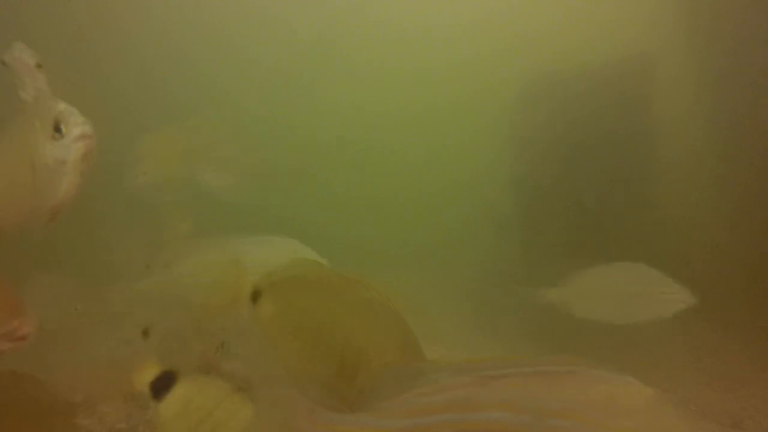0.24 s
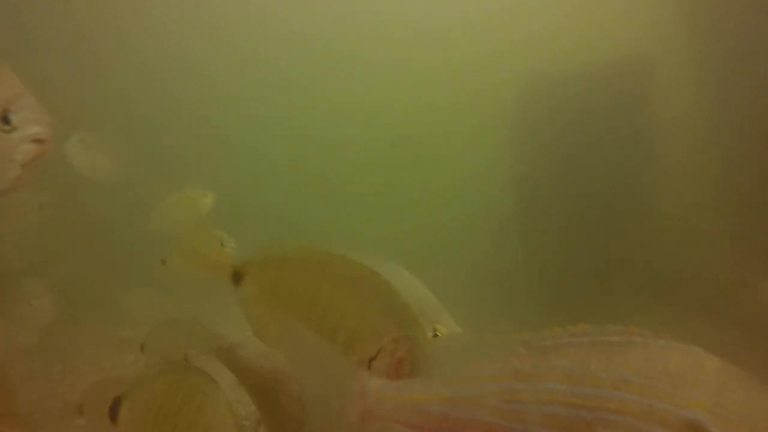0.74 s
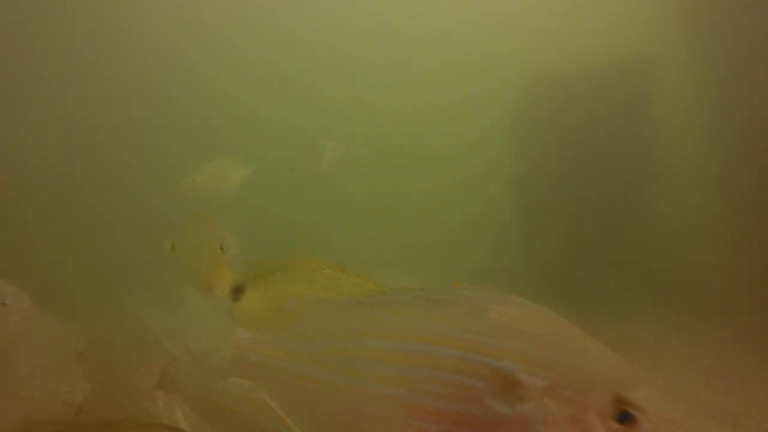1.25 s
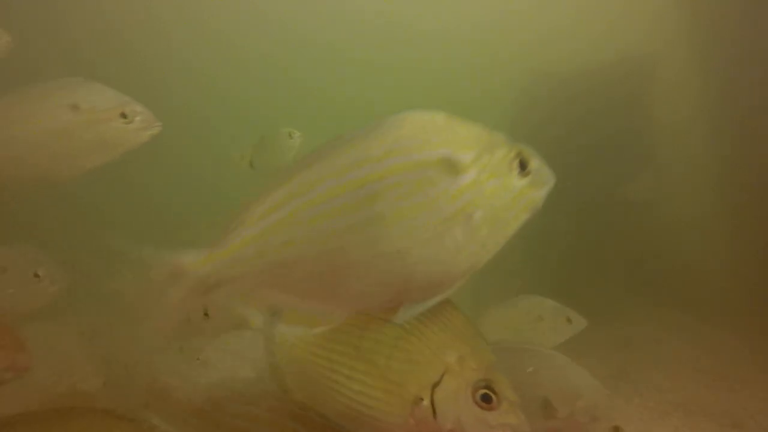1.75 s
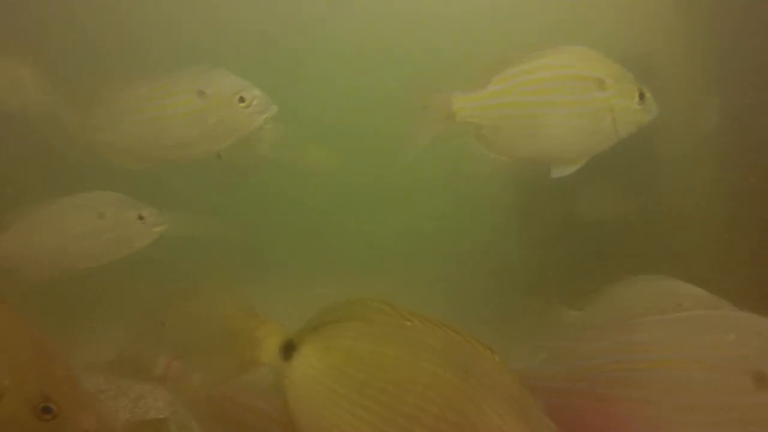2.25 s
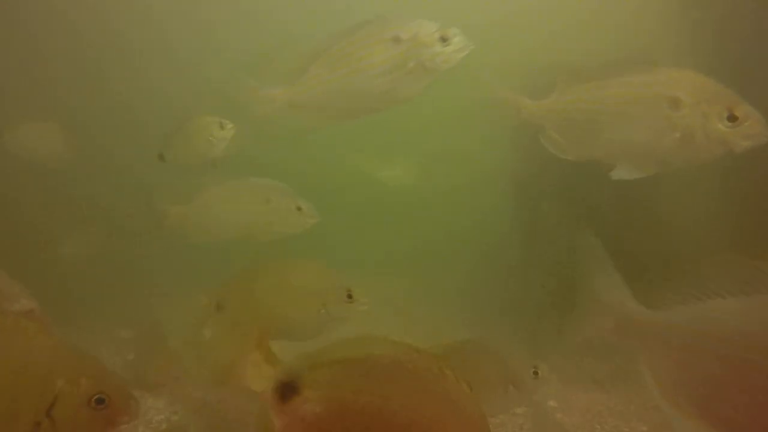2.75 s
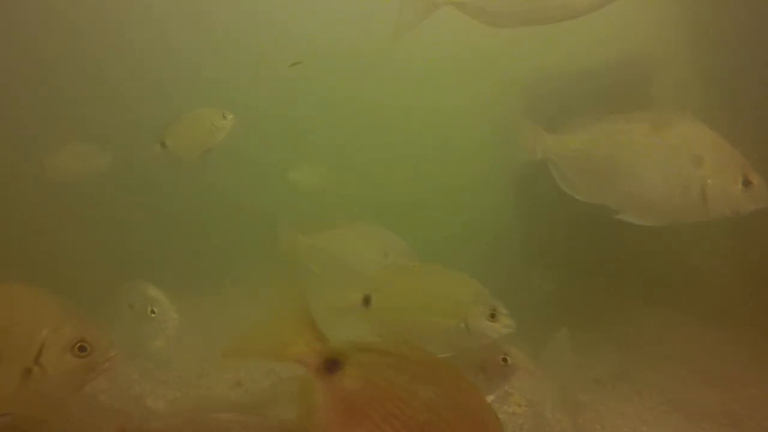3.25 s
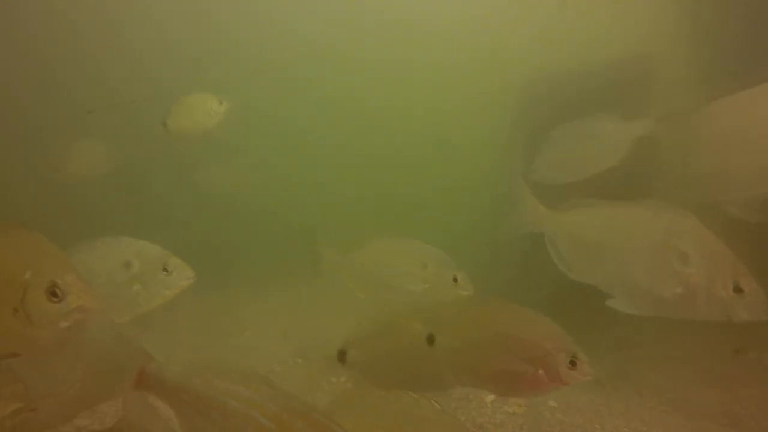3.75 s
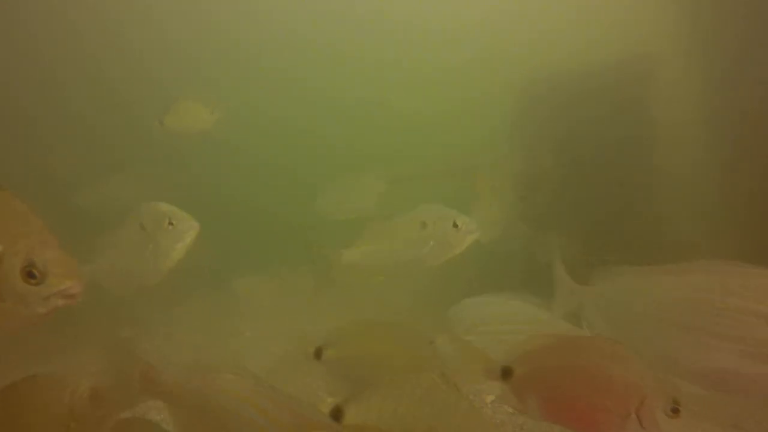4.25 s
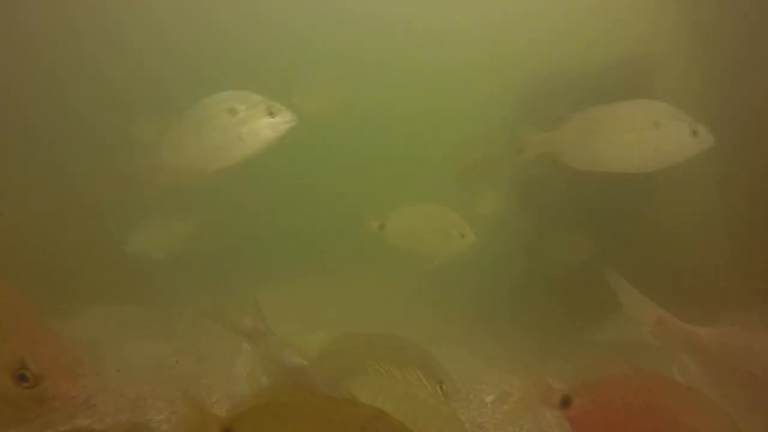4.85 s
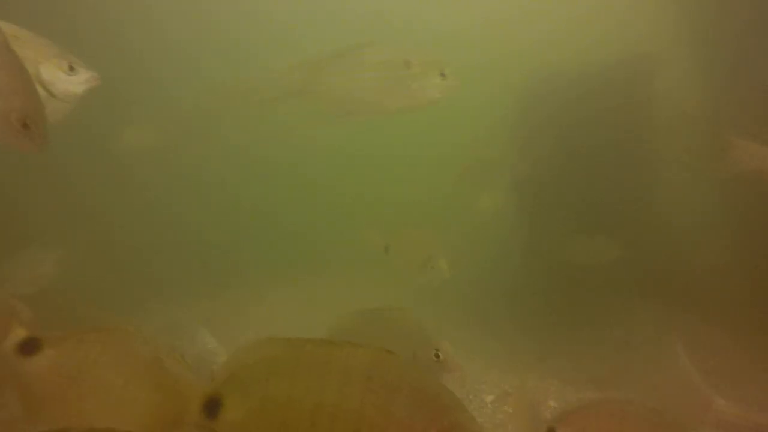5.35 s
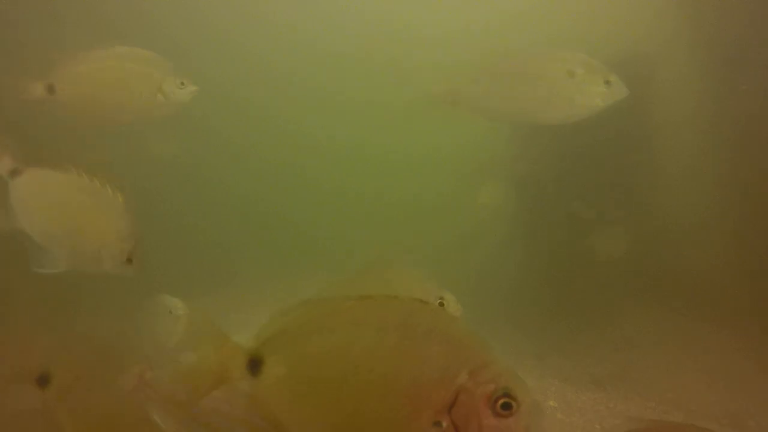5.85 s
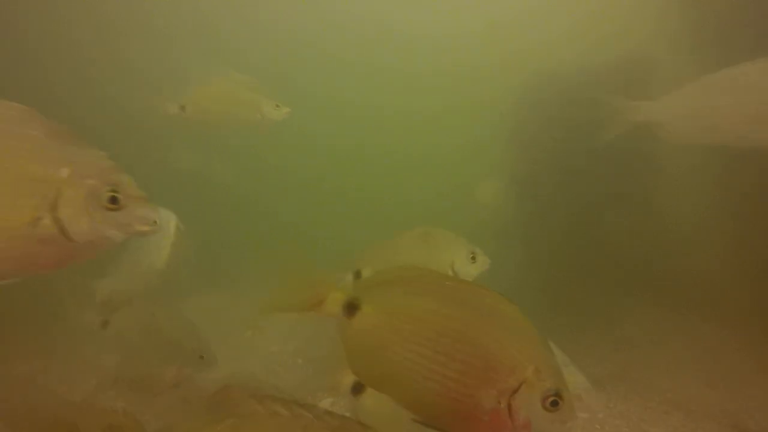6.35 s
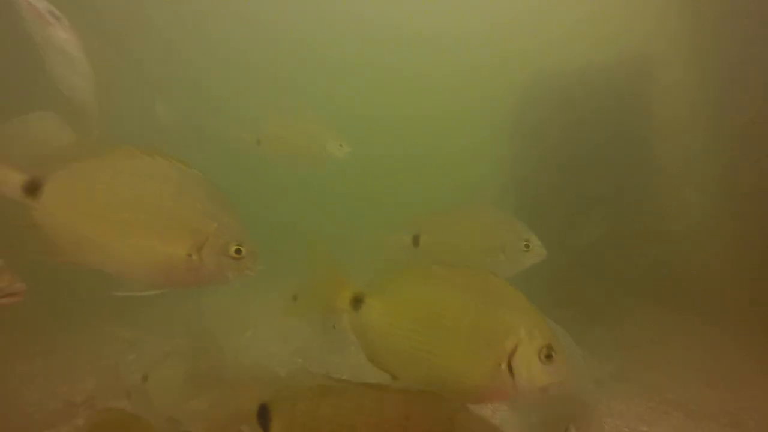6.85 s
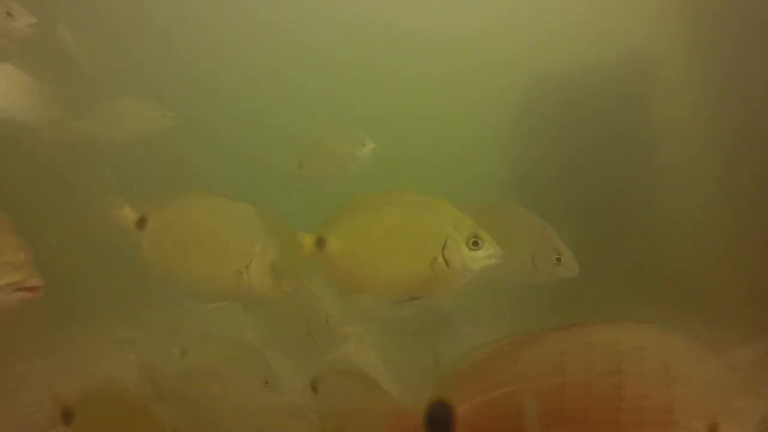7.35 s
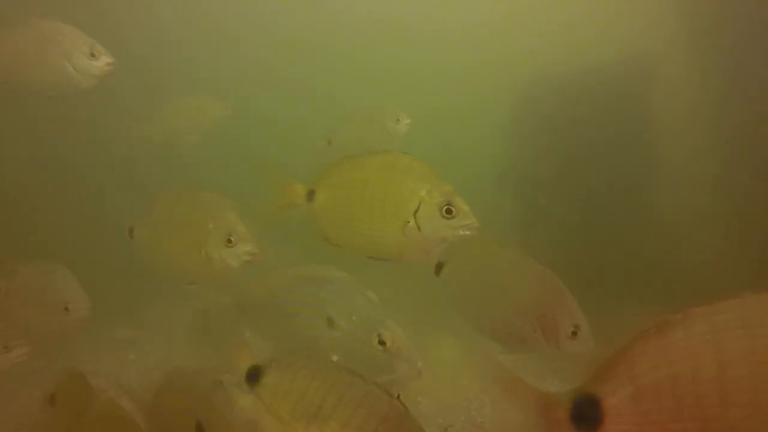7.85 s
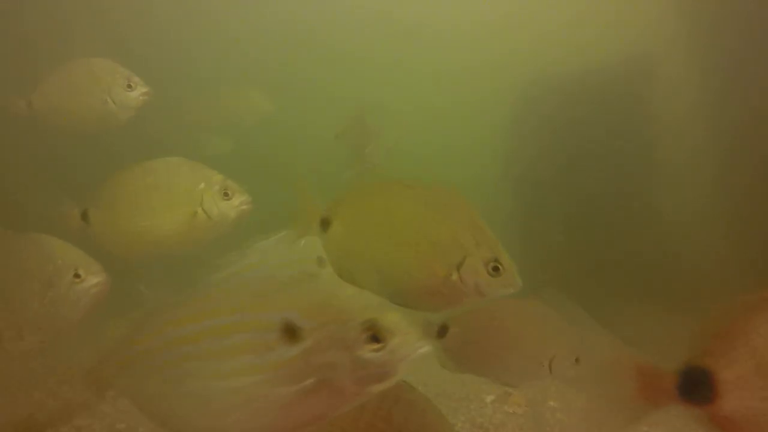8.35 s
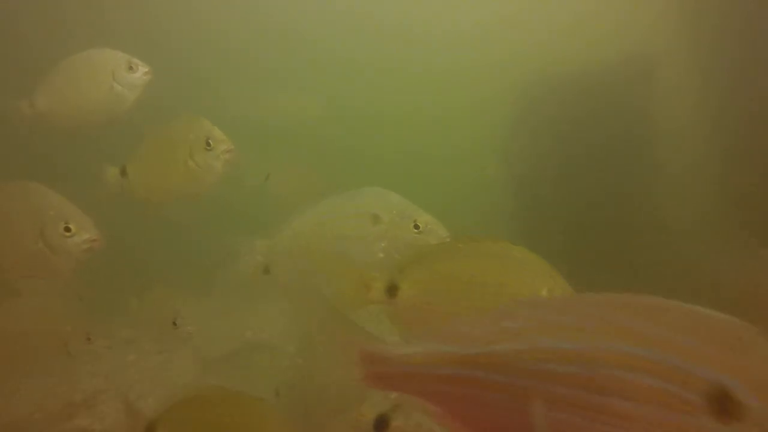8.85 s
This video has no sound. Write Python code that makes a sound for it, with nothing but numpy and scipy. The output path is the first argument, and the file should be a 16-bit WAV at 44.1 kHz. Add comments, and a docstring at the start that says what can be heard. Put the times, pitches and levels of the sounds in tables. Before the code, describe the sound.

Underwater on the bottom beside a pier, snapping shrimp make a continuous fine crackle with many sharp, ringing clicks close by. Water pushed by feeding fish rumbles and thumps in surges, with small gurgles and bubble blips. A deep wavering drone swells strongest near the start, and low gliding hums resemble a distant motor. The microphone sits in a waterproof case, giving a hollow, muffled, resonant colour.

```python
"""Snapping shrimp and fish beside a pier

A microphone in a waterproof case lies on the bottom beside a pier, among feeding fish.
Snapping shrimp crackle all around: sharp pulses and noise bursts ring the resonances of the case.
Water pushed by passing fish rumbles, thumps and gurgles: shaped noise, short tones and ringing clicks.
A low, wavering sine drone comes and goes, and a few sine hums glide in pitch like a distant motor.
An even wash of filtered noise lies under it all."""
import sys
import numpy as np
from scipy import signal
from scipy.fft import rfft, irfft, next_fast_len
from scipy.io import wavfile
from scipy.ndimage import uniform_filter1d

SR = 44100
rng = np.random.default_rng(int(sys.argv[2]) if len(sys.argv) > 2 else 0)


def dump(signal):
    """Clip the signal to [-1, 1] and save it as 16-bit WAV at the path in sys.argv[1]."""
    limited = np.clip(np.atleast_2d(signal).T, -1, 1)
    pcm = np.round(limited * 32767).astype(np.int16)
    wavfile.write(sys.argv[1], SR, pcm)


N = 401310


def from_db(db):
    """Decibels to gain."""
    return 10 ** (np.asarray(db) / 20)


def rms_one(x):
    """Scale to an rms of 1."""
    return x / np.sqrt(np.mean(x ** 2) + 1e-20)


def add(out, s, sound):
    """Mix a sound in at a time in seconds."""
    at = max(round(s * SR), 0)
    out[at:at + len(sound)] += sound[:max(N - at, 0)]


def butter(x, hz, kind, order=2):
    """Causal Butterworth filter."""
    sections = signal.butter(order, hz, kind, fs=SR, output="sos")
    return signal.sosfilt(sections, x + 1e-18)


def resonate(x, hz, width_hz):
    """One two-pole resonance, gain about 1 on top; the narrower, the longer it rings."""
    r = np.exp(-np.pi * width_hz / SR)
    feed = np.array([1, 0, -1]) * (1 - r * r) / 2
    feedback = [1, -2 * r * np.cos(2 * np.pi * hz / SR), r * r]
    return signal.lfilter(feed, feedback, x + 1e-18)


def noise(spectrum):
    """Noise shaped to a spectrum of (frequency [Hz], relative level [dB]); rms 1."""
    hz, db = np.transpose(spectrum)
    size = next_fast_len(N)
    bins = np.maximum(np.arange(size // 2 + 1) * SR / size, 1)
    curve_db = np.interp(np.log(bins), np.log(hz), db, left=-120, right=-120)
    white = rfft(rng.standard_normal(size))
    return rms_one(irfft(white * from_db(curve_db), size)[:N])


def drift(per_s):
    """Random wander through per_s points a second; rms 1."""
    points = rng.standard_normal(4000)
    return rms_one(np.interp(np.arange(N) / SR * per_s, np.arange(len(points)), points))


def clicks(per_s, spread_db):
    """Random clicks of either sign: many small, a few large."""
    sizes = from_db(spread_db * np.minimum(rng.exponential(1, N), 4))
    signed = sizes * rng.choice([-1, 1], N)
    return signed * (rng.random(N) < per_s / SR)


def spells(rows, rise_db_per_s, fall_db_per_s, rest_db):
    """Gain that rises, holds and falls back to a resting level, once for each row (s, hold s, dB)."""
    t, power = np.arange(N) / SR, from_db(rest_db) ** 2
    for s, hold_s, db in rows:
        before_db = rise_db_per_s * np.maximum(s - t, 0)
        after_db = fall_db_per_s * np.maximum(t - s - hold_s, 0)
        power = power + from_db(db - before_db - after_db) ** 2
    return np.sqrt(power)


def case(x):
    """Sound in the water reaches the microphone through the parallel resonances of the case."""
    # resonances of the case: (frequency [Hz], width [Hz], relative level [dB])
    resonances = [(730, 38, -73), (1606, 67, -3.5), (1973, 102, -1), (2331, 245, 2), (2780, 120, 1.5),
                  (2996, 110, -2.5), (3600, 189, 0.5), (4200, 340, -8.5), (5175, 256, -4.5),
                  (5860, 2070, -13.5), (7890, 680, -13.5), (8770, 420, -16.5), (10840, 780, -19),
                  (12200, 510, -20), (15000, 830, -35)]
    rung = 0
    for k, (hz, width_hz, db) in enumerate(resonances):
        rung = rung + (-1) ** k * from_db(db) * resonate(x, hz, width_hz)  # neighbours alternate in sign
    return butter(rung, 330, "high")


def far_shrimp(per_s=150, spread_db=5.0, smear_s=0.0036, tilt_db=0.14, level_db=-50.5):
    """Hundreds of far snaps a second, smeared by their paths in five colours, merge into a frying crackle."""
    out, keep = 0, np.exp(-2 / (smear_s * SR))
    for k, hz in enumerate(np.geomspace(2100, 10000, 5)):
        power = signal.lfilter([1], [1, -keep], clicks(per_s, spread_db) ** 2 + 1e-18)
        bursts = rms_one(np.sqrt(power) * rng.standard_normal(N))
        band_hz = [hz / 1.51, min(hz * 1.45, .45 * SR)]
        out = out + from_db(k * tilt_db) * butter(bursts, band_hz, "band")
    return from_db(level_db) * rms_one(case(out))


def sea_wash(level_db=-52.0):
    """The even wash of the sea: steady shaped noise."""
    # spectrum of the wash: (frequency [Hz], relative level per Hz [dB])
    wash_spectrum = [(20, -5), (70, -3.5), (125, -2.5), (200, -4), (420, -10.5), (750, -14), (1050, -17),
                     (1400, -19), (2300, -8.5), (4600, -21), (7500, -23.5), (12400, -32.5), (15000, -35.5),
                     (16000, -60)]
    return from_db(level_db) * noise(wash_spectrum)


def steadied(x, window_s=0.18):
    """Noise with its slow level swings evened out."""
    return x / np.sqrt(uniform_filter1d(x * x, int(window_s * SR)) + 1e-6)


def moving_water(swell_db=0.5, rumble_db=1.5, gurgle_db=-1.0, slosh_db=-12.0, lumpy_db=2.0, patchy_db=3.5):
    """Eddies press on the case; stirred water gurgles in short rings, strongest near its lowest resonance."""
    # surges of water round the case:
    # (time at full strength [s], hold [s], relative slow swell [dB], relative eddies [dB])
    surges = [(0.102, 0.52, -53.5, -52), (0.947, 0.74, -50, -40), (2.45, .08, -70, -59),
              (3.0, 0.21, -57.5, -61), (4.05, 0.39, -45, -40.5), (4.85, 0.37, -64, -50),
              (6.85, 0.18, -42.5, -39.5), (7.95, 0.39, -70, -53.5), (8.9, 0.23, -43, -40)]
    # stirred, gurgling water: (time at full strength [s], hold [s], relative level [dB])
    gurgles = [(.75, 1, -62), (3.7, 0.14, -58), (4.25, 0.76, -57), (7.5, 0.3, -54)]
    # spectrum of the eddies: (frequency [Hz], relative level per Hz [dB])
    rumble_spectrum = [(25, -26), (42, -1), (54, 6), (66, 9.5), (82, 5.5), (100, -8.5), (130, -26.5),
                       (250, -36.5), (500, -70)]
    swell_rows = [(s, hold_s, db) for s, hold_s, db, _ in surges]
    rumble_rows = [(s, hold_s, db) for s, hold_s, _, db in surges]
    swell = spells(swell_rows, rise_db_per_s=32, fall_db_per_s=40, rest_db=-63)
    rumble = spells(rumble_rows, rise_db_per_s=34, fall_db_per_s=44, rest_db=-59)
    gurgle = spells(gurgles, rise_db_per_s=31, fall_db_per_s=24, rest_db=-64.5)
    swell, rumble, gurgle = (gain * from_db(lumpy_db * drift(12)) for gain in (swell, rumble, gurgle))

    pressure = steadied(noise([(12, -17), (22, -15), (31, 3), (39, -23), (60, -38)]))
    eddies = steadied(noise(rumble_spectrum))
    low = from_db(swell_db) * swell * pressure + from_db(rumble_db) * rumble * eddies

    rings = 0
    for hz in np.geomspace(180, 950, 24):
        stirred = clicks(per_s=70, spread_db=5.5) * from_db(patchy_db * drift(10))
        rings = rings + resonate(stirred, hz, hz / 15)
    gurgling = from_db(gurgle_db) * rms_one(resonate(rings, 739, 79))
    slosh = from_db(slosh_db) * rms_one(butter(rings, 300, "low"))
    return low + gurgle * (gurgling + slosh)


def drone(idle_hz=54.4, sag_hz=2.45, waver_hz=1.36, flutter_db=1.0, drone_db=0.5):
    """A wavering sine drone swells and fades, and sags a little in pitch when it is loud."""
    # swells of the drone: (time at full strength [s], hold [s], relative level [dB])
    drone_swells = [(.76, .02, -44.5), (1.12, 0.52, -28), (3.7, 0.43, -37), (4.45, 0.18, -41),
                    (4.95, .28, -41.5), (6.55, 0.48, -42.5), (8.95, 0.19, -38.5)]
    gain = spells(drone_swells, rise_db_per_s=68.5, fall_db_per_s=71, rest_db=-61)
    hz = idle_hz - sag_hz * gain / gain.max() + waver_hz * drift(12)
    tone = np.sin(2 * np.pi * np.cumsum(hz) / SR)
    return gain * from_db(drone_db + flutter_db * drift(11)) * tone


def hums(hum_db=1.0, rough_db=3.0, wobble=0.013, fade_s=0.1):
    """Each hum is a sine that glides along one smooth arc of pitch, slightly unsteady."""
    # gliding hums: (time [s], length [s], first pitch [Hz], middle pitch [Hz], last pitch [Hz],
    # relative level at the start [dB], fading [dB per s])
    glides = [(0.148, 0.57, 277, 279, 274, -61.5, -5), (0.886, 0.49, 273.3, 278, 270, -53, 24),
              (3.68, 0.48, 173.2, 138.5, 92, -40.5, 15), (4.64, 0.44, 156, 148.5, 136, -53, 29),
              (6.623, 0.64, 89.5, 102.5, 110, -38, 3.5), (7.248, 0.95, 108, 103.5, 84.3, -43.5, 2.5),
              (6.596, 0.72, 133.4, 154, 156, -46, 11), (7.399, 0.79, 160.6, 153.7, 120, -59, -7)]
    out = np.zeros(N)
    shake, stray = from_db(hum_db + rough_db * drift(22)), 1 + wobble * drift(40)
    for s, length_s, first_hz, middle_hz, last_hz, db, fading in glides:
        t = np.arange(N) / SR - s
        arc = np.polyfit([0, .5, 1], [first_hz, middle_hz, last_hz], 2)
        hz = np.polyval(arc, np.clip(t / length_s, 0, 1))
        fades = np.clip(np.minimum(t, length_s - t) / fade_s, 0, 1)
        gain = fades * from_db(db - fading * np.clip(t, 0, length_s))
        out += gain * shake * np.sin(2 * np.pi * np.cumsum(hz * stray) / SR)
    return out


def snap(body_db, hz, crack_db, far_db=-33.0, thud_db=-20.5, sharpness=1.77, edge=1.245):
    """A collapsing cavity gives one sharp pulse; the bottom and the piles scatter a short tail after it."""
    echo_lag_s, echo_db = 0.000327, -9
    crack_above_hz, crack_rolloff_hz = 5260, 12900
    t = np.arange(SR // 14) / SR
    direct = np.clip(from_db(max(body_db, crack_db) - far_db), .3, 3.0)  # faint snaps arrive mostly scattered
    tail = .13 * np.exp(-t / .0015) + .022 * np.exp(-t / .011)
    # the air in the case sends the pulse back upside down
    echo = from_db(echo_db) * np.sinc((t - echo_lag_s) * SR)
    pulse = direct * ((t == 0) - echo) + tail * rng.standard_normal(len(t))
    rung = case(pulse)
    body = butter(resonate(rung, hz, hz / sharpness), hz * edge, "low", order=5)
    crack = butter(butter(rung, crack_above_hz, "high", order=6), crack_rolloff_hz, "low")
    thud = butter(pulse, [520, 1150], "band")
    hardness_db = min(32 * np.log2(hz / 3200), 0)  # only full, hard snaps shake the case this low
    parts = (body, body_db), (crack, crack_db), (thud, body_db + thud_db + hardness_db)
    # each part is levelled over its first 8 ms
    return sum(from_db(db) * part / part[t < .008].std() for part, db in parts)


def near_shrimp():
    """The loud snaps from close by, each a pulse ringing the case."""
    # near snaps, rms over the first 8 ms:
    # (time [s], body level [dB], centre of the body [Hz], treble crack level [dB])
    near_snaps = [(0.261, -34, 3670, -39.5), (0.7006, -42, 3570, -48), (0.7593, -42, 3600, -40.5),
                  (0.998, -35.5, 2820, -55), (1.1217, -39, 3250, -48.5), (1.194, -34, 3050, -43.5),
                  (1.2585, -41.5, 3080, -52), (1.3282, -48, 3380, -49), (1.6536, -41.5, 3420, -42),
                  (1.726, -42, 2530, -47), (2.295, -39.5, 3570, -43.5), (2.3895, -45.5, 3600, -49),
                  (2.5594, -41, 2560, -57), (2.805, -42.5, 3460, -45), (2.8933, -42.5, 3170, -48),
                  (2.9183, -37.5, 3050, -47), (3.0365, -40, 3450, -47), (3.205, -42.5, 3170, -52),
                  (3.3858, -29, 2720, -37), (3.6426, -30, 3300, -32), (3.8616, -24.3, 3520, -29),
                  (3.9224, -27, 2550, -44.5), (4.4113, -32.5, 2800, -56), (4.7618, -41.5, 3100, -47),
                  (4.796, -43, 4200, -45), (5.063, -42.5, 2920, -48), (5.1225, -37.5, 3570, -39),
                  (5.3559, -21.5, 3580, -41), (5.4766, -38, 3700, -52), (5.499, -22, 3160, -38),
                  (5.596, -40, 2420, -50), (5.6982, -42, 4200, -40), (5.7697, -30.5, 3600, -37.5),
                  (6.06, -40, 3400, -42), (6.0815, -40, 2950, -47), (6.1523, -40, 3650, -48.5),
                  (6.3612, -39.5, 3250, -36.5), (6.433, -34.5, 2180, -68), (6.707, -38, 2270, -48),
                  (6.8466, -39, 3020, -46), (7.2842, -39, 2300, -57), (7.4736, -40, 3940, -48),
                  (7.5909, -20.5, 3300, -29), (7.668, -36, 2530, -46), (8.0336, -28, 2460, -43.5),
                  (8.106, -38.5, 3050, -48), (8.1618, -42, 4070, -42), (8.1903, -32.5, 2750, -60),
                  (8.309, -36, 2830, -51), (8.3617, -32, 2240, -65), (8.544, -35, 2860, -47),
                  (8.6709, -33, 2130, -48), (8.902, -28.5, 2290, -48), (9.0522, -29.5, 2630, -39.5)]
    out = np.zeros(N)
    for s, *row in near_snaps:
        add(out, s, snap(*row))
    return out


def scattered_shrimp(count=10, body_db=-44.5, crack_db=-43.0, centre_hz=3100, spread_db=1.5):
    """Fainter snaps from a little farther off, at random moments."""
    out = np.zeros(N)
    times = rng.uniform(0, N / SR, count)
    for s, (size, colour, hardness) in zip(times, rng.standard_normal((count, 3))):
        hz = centre_hz * 2 ** (colour / 4)
        add(out, s, snap(body_db + spread_db * size, hz, crack_db + spread_db * hardness))
    return out


def blip(hz, db, swell_s, rise_per_s=0):
    """A short tone that swells and dies away; with a rise it climbs in pitch as it rings."""
    t = np.arange(SR // 4) / SR
    shape = (t / swell_s * np.exp(1 - t / swell_s)) ** 2
    return from_db(db) * shape * np.sin(2 * np.pi * hz * t * (1 + rise_per_s * t / 2))


def blips(rows):
    """One blip for each row of a table."""
    out = np.zeros(N)
    for s, *row in rows:
        add(out, s, blip(*row))
    return out


def thumps():
    """Pushes of water and soft knocks on the case: short tones of steady pitch."""
    # (time [s], pitch [Hz], peak level [dB], swell time [s])
    pushes = [(.316, 60, -24.5, .018), (.79, 86.5, -34, 0.016), (.788, 221, -41.5, 0.016),
              (3.598, 72, -26.5, 0.02), (4.08, 70.6, -24.5, 0.022), (4.225, 174, -48, 0.016),
              (5.115, 85, -31, 0.028), (5.12, 200, -41, 0.007), (7.81, 203, -40.5, 0.011),
              (8.7005, 292.6, -32.5, 0.0032), (8.7005, 524, -35.5, 0.0027)]
    return blips(pushes)


def bubbles():
    """Ringing bubbles: short tones, most of them rising in pitch."""
    # (time [s], pitch at the start [Hz], peak level [dB], swell time [s], relative pitch rise [per s])
    bubble_rings = [(.8, 437, -54, 0.0082, 0), (1.645, 797, -51, 0.0096, 0.5), (1.885, 497, -51, 0.013, 0),
                    (2.21, 827, -45, 0.011, 3), (3.67, 884, -46, 0.0042, 0), (4.67, 188.8, -50.5, 0.03, 1),
                    (5.398, 930, -45, 0.0033, 3), (5.96, 166, -48.5, 0.039, 2.5),
                    (6.02, 253, -45.5, 0.016, 2), (6.512, 477, -43.5, 0.014, 3.5),
                    (6.553, 602, -45.5, 0.016, 7), (6.742, 730, -49, 0.014, 3), (8.24, 690, -47, 0.0081, 2)]
    return blips(bubble_rings)


def swirls():
    """A flick of a fin swirls the water: a short, broad swish of band-passed noise."""
    # swirls from fin strokes: (time at the loudest [s], level [dB], half length [s], centre [Hz])
    fin_strokes = [(0.808, -49, 0.017, 380), (4.75, -61.5, 0.13, 463), (5.127, -57, 0.06, 427),
                   (6.528, -57, 0.016, 543), (7.848, -55, 0.094, 336)]
    t, out = np.arange(N) / SR, np.zeros(N)
    for s, db, half_s, hz in fin_strokes:
        swish = rms_one(butter(rng.standard_normal(N), [hz / 1.57, hz * 1.77], "band"))
        out += from_db(db) * swish / (1 + ((t - s) / half_s) ** 4)
    return out


def scene():
    """Everything that reaches the case, as one channel."""
    shrimp = far_shrimp() + near_shrimp() + scattered_shrimp()
    water = sea_wash() + moving_water() + thumps() + bubbles() + swirls()
    return (shrimp + water + drone() + hums())[None]


def record(dry):
    """The top rolls off and is cut steeply."""
    rolled_off = butter(dry, 14800, "low", order=8)
    steep_cut = signal.ellip(10, .2, 90, 16000, fs=SR, output="sos")
    return signal.sosfilt(steep_cut, rolled_off)


dry = scene()
out = record(dry)
dump(out)
```